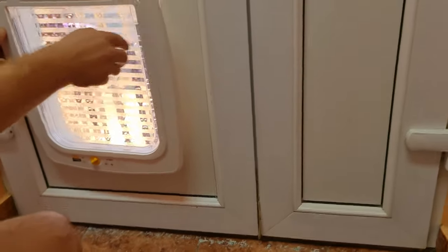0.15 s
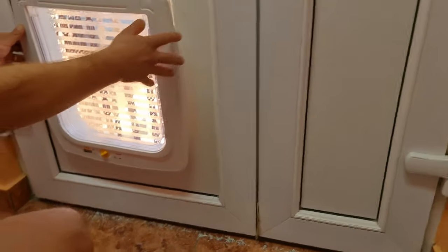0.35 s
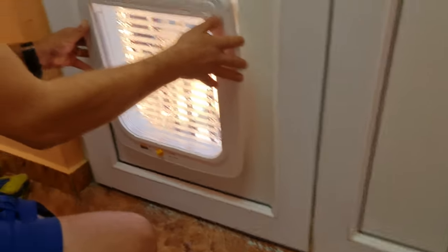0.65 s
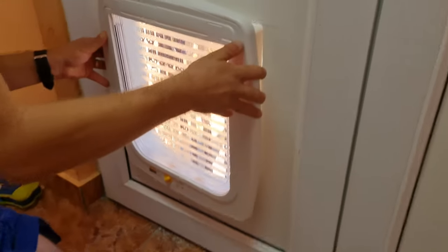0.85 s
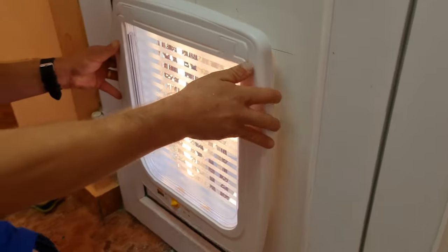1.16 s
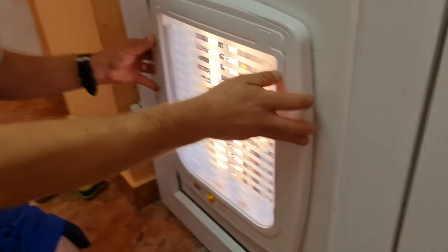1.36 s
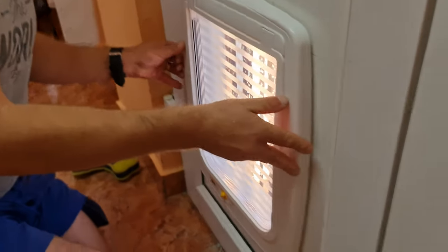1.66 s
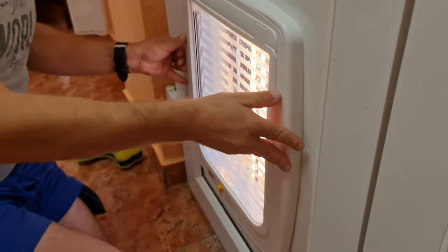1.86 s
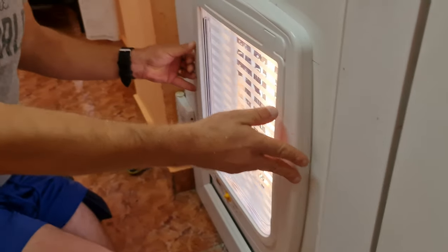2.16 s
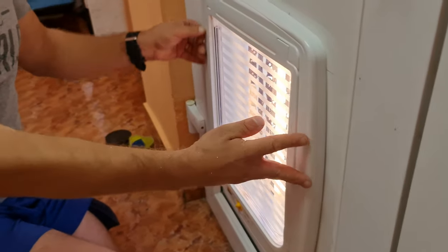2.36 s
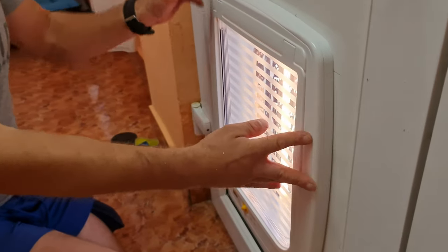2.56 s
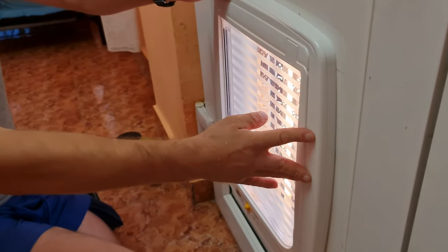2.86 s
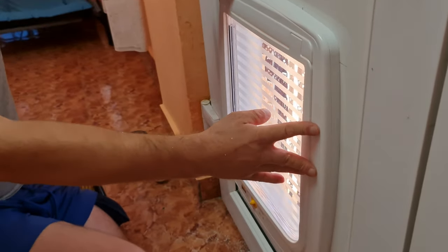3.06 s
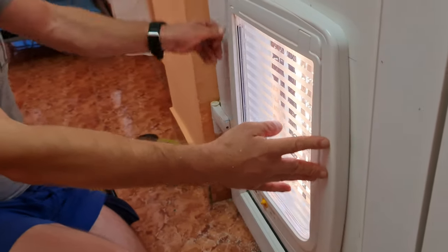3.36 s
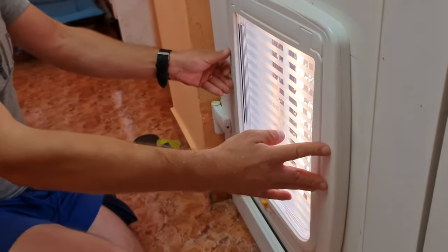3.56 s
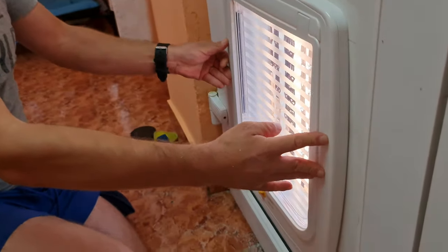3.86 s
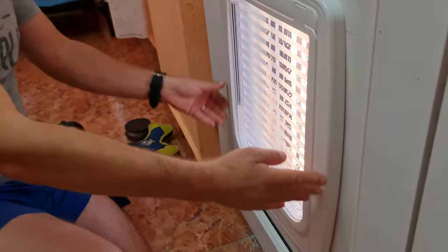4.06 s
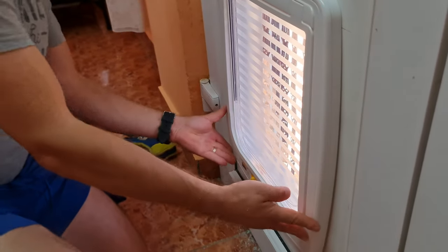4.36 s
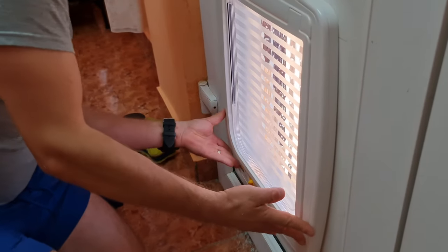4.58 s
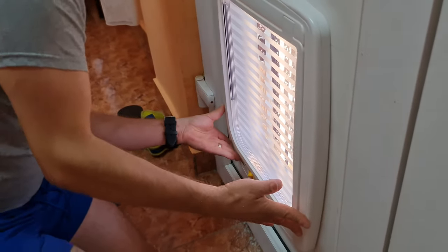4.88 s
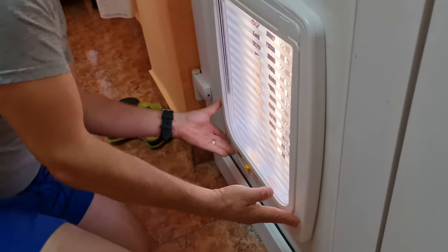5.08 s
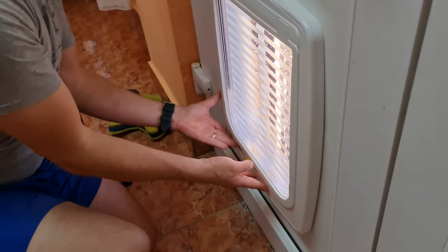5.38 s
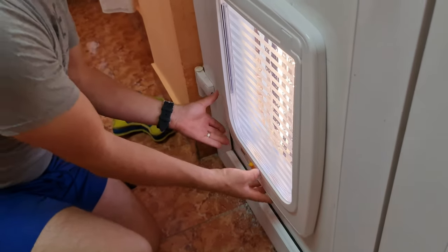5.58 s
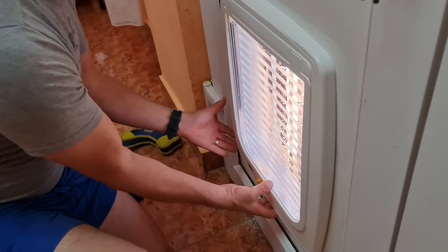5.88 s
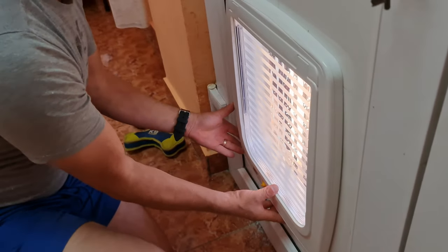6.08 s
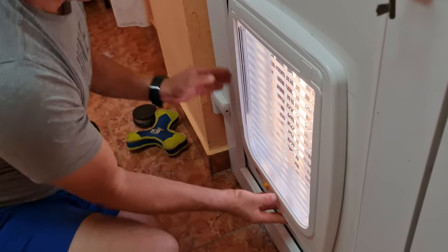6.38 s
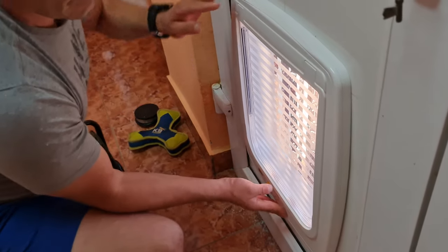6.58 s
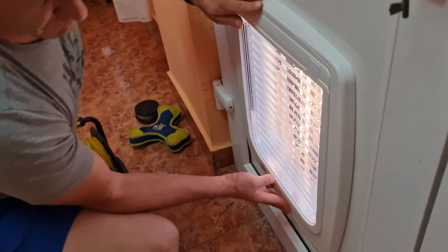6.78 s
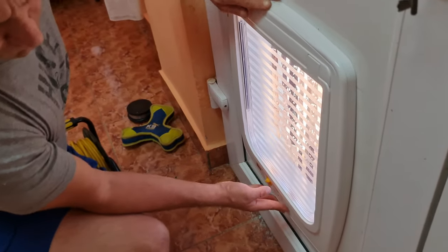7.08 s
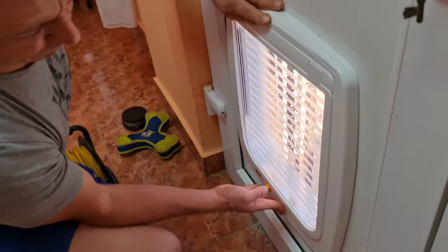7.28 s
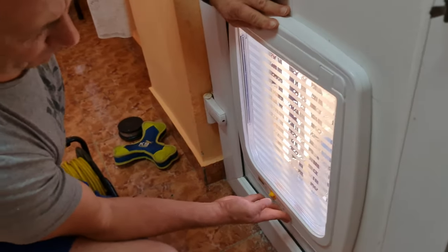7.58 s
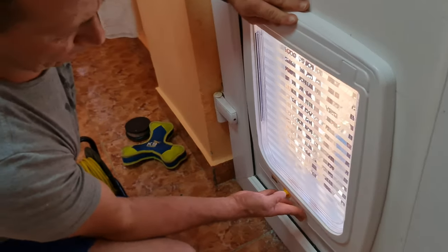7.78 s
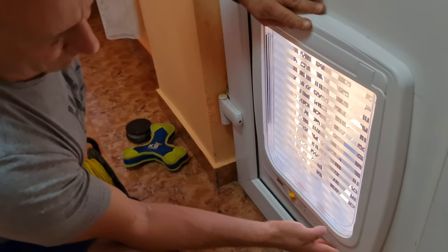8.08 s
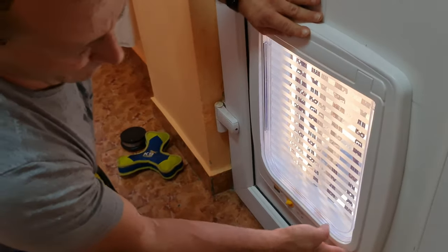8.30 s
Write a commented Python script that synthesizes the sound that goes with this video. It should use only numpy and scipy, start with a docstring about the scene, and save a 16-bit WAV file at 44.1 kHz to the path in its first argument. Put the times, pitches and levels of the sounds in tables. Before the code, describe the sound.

Hands knock a plastic pet-door frame against a hollow plastic door, with light finger taps, faint rubbing, and two buzzy catches snapping home in a small hard room.

```python
"""Dog flap pressed into a hollow door

Hands press a plastic frame into a hollow plastic door in a small hard room; two catches chatter and snap home.
Knocks and taps are shaped noise decays coloured by resonances; the door's boom is a sum of damped sine modes.
Snaps repeat one contact at a steady rate; sliding hands and the swaying door are noise under moving envelopes.
A brief soft hiss swells just before each knock, snap and tap.
A small metal part rings faintly at the start, and quiet room air lies beneath."""
import sys
import numpy as np
from scipy import signal
from scipy.fft import rfft, irfft, next_fast_len
from scipy.io import wavfile
from scipy.ndimage import map_coordinates

SR = 44100
rng = np.random.default_rng(int(sys.argv[2]) if len(sys.argv) > 2 else 0)


def to_wav(sig):
    """Store sig (one row per channel, or 1-D mono) as 16-bit WAV at the path in sys.argv[1].

    Samples outside -1..1 are clipped; the rate is SR.
    """
    pcm = np.clip(np.atleast_2d(sig), -1, 1) * 32767
    pcm = np.round(pcm).astype(np.int16)
    wavfile.write(sys.argv[1], SR, pcm.T)  # frames by channels


N = 372204
T = np.arange(SR) / SR  # one second of time [s]

# Blows of the frame on the door: (time [s], blow level [dB], boom, thud, body, click, fizz weights [dB],
# crack relative to the blow [dB], favoured resonance [Hz], push of the palm [dB])
KNOCKS = [(0.4927, -16.5, -18, -19.5, -0.5, -22.5, -41, -4, 453, -43),
          (1.0138, -8.5, -28, -11, 1, -13.5, -33.5, 6.5, 730, -43),
          (1.209, -20, -11, 0, -8, -47, -30, -20, 390, -34),
          (1.2416, -4, -52, -8, -4, -8, -26.5, -16, 1440, -29),
          (1.797, -35.5, -12, 6, 2, -9, -32, -20, 221, -38),
          (1.823, -16.5, -17, -7.5, 4, -11, -23, -18, 1300, -37),
          (1.835, -14.5, -5, -6.5, -17, -8, -14.5, 8.5, 1400, -36),
          (2.897, -23.5, -5, -12, -4, -9.5, -14, -3, 1700, -36.5),
          (3.443, -29, -11, -8.5, -4.5, -6, -17, -10, 1600, -55),
          (3.695, -23, -21, -10.5, -9, -14, -39, 6.5, 710, -42),
          (4.69, -31.5, -13, -7, -16, -16, -18, -18, 660, -39),
          (4.83, -27.5, -9, -16, -3.5, -20.5, -25, -22, 660, -37.5)]
# Catches snapping home: (time [s], blow level [dB], boom, thud, body, click, fizz weights [dB],
# favoured resonance [Hz], left minus right [dB], chatter rate [Hz], chatter's share of the power [0-1])
SNAPS = [(6.7577, -9.5, -18, -12.5, -3, -4, -10.5, 1150, 0.5, 378.3, 0.77),
         (8.3079, -13, -28, -8, -8.5, -1.5, -14, 4020, -0.5, 251.7, 0.87)]
# Fingers tapping the frame: (time [s], tap level [dB], weight behind it [dB], hardness [dB],
# favoured resonance [Hz])
TAPS = [(0.153, -28, -9.5, -36, 1250), (0.186, -35.5, -20, -7, 1050), (1.376, -31, -6, 1, 1136),
        (1.749, -34.5, -39, -11.5, 1290), (1.99, -26.5, -23, -15, 957), (2.116, -29, -29, -9.5, 690),
        (2.203, -32.5, -16, -24, 780), (2.334, -36.5, -11, -3.5, 1460), (2.372, -33.5, -20, -7.5, 1160),
        (2.522, -39.5, -21, -16, 545), (3.008, -28.5, -20, -14.5, 1670), (3.074, -29, -38, -18, 1100),
        (3.168, -33, -21, -8, 653), (3.271, -39, -21, -22, 804), (3.505, -39, -24, -2.5, 1080),
        (3.615, -37, -7, -4, 1370), (3.792, -33.5, -1, -24, 564), (3.935, -31.5, -14, -9.5, 554),
        (3.979, -34, -23, -19, 729), (4.095, -36, -8, -1, 1360), (4.143, -53.5, -23, 17.5, 670),
        (4.383, -36.5, -6, -10.5, 640), (4.578, -42.5, -5, -22, 675), (5.025, -39.5, -25, -8, 1660),
        (5.124, -36.5, -3.5, -29, 665), (5.247, -37.5, -15, -17, 805), (5.32, -37.5, -12, -12, 705),
        (5.622, -28, -18.5, -18.5, 710), (5.773, -33, -1.5, -9.5, 596), (6.027, -41.5, -9, -1.5, 1370),
        (6.042, -41.5, -24, -12, 606), (6.203, -28.5, -14, -6.5, 725), (6.385, -42, -6, -22, 780),
        (6.689, -29.5, -15, -8, 2240), (6.732, -36.5, -9.5, 4, 1120), (7.338, -35, -1, -1, 790),
        (7.614, -36, -10.5, -11, 1134), (7.702, -33.5, 0, -7, 940), (7.94, -34, -25, -22, 707),
        (7.961, -46.5, -4, 6.5, 654), (8.005, -39.5, -14, -7, 670), (8.195, -29.5, -18, -12, 695)]
# Relative spectrum of the fine hiss in slides and lead-ins: (frequency [Hz], density [dB per Hz])
HISS = [(880, -5), (1500, -4.5), (2110, -7), (2780, -4.5), (3120, -8.5), (6690, -8), (7670, -15),
        (12400, -17), (15500, -20)]


def knocks():
    """Impact and rebound: a lead-in, a blow, one bounce and the panel's boom; gentler blows close more slowly."""
    # Hard edge on hard edge, relative spectrum: (frequency [Hz], density [dB per Hz])
    crack_spectrum = [(800, -23), (2500, -52), (3800, 13.5), (4800, 1), (6500, -4), (9000, -63),
                      (15000, -51)]
    bounce_s, bounce_db, crack_t60_s = 0.0068, -10, 0.021
    out = np.zeros((2, N))
    for s, db, boom_db, thud_db, body_db, click_db, fizz_db, crack_db, ring_hz, _ in KNOCKS:
        blow = contact(rise=0.00034 * amp(-0.7 * db), damping=0.96, edge_db=-7.5, room_db=2.0)
        bounce = contact(rise=0.0001, damping=1.7, edge_db=-23.5, room_db=3.5)[:, :SR // 2]
        add(blow, bounce_s, amp(bounce_db) * bounce)
        clack = frame(blow, boom_db, thud_db, body_db, click_db, fizz_db, ring_hz, ring_db=5.0)
        crack = amp(db + crack_db - 18.5 - 60 * T / crack_t60_s) * noise(SR, crack_spectrum)
        add(out, *lead_in(s, 0.32 * db - 15.5))
        add(out, s, amp(db + 35.5) * clack)
        add(out, s, crack)
        add(out, s, amp(db - 9.0) * panel(boom_db, thud_db, body_db, rise=0.0093))
    return placed(out, pan_db=-0.1)


def snaps():
    """Periodic stick-slip: a catch skids over its ridge in even slips that buzz at a pitch, plus one plain blow."""
    # The catch's peaks and dips: (centre [Hz], width [Hz], gain [dB])
    catch = [(340.4, 35, 6.5), (585, 41, 6.5), (686, 100, 5), (758, 68, -2), (1160, 46, 5.5),
             (1875, 870, 8), (6400, 760, -1), (12300, 3600, -5.5)]
    slip_count, jitter, skid_s = 12, 0.008, 0.012  # jitter is in slip periods
    out = np.zeros((2, N))
    for (s, db, boom_db, thud_db, body_db, click_db, fizz_db,
         ring_hz, pan_db, chatter_hz, share) in SNAPS:

        def catch_colour(x):
            """Resonant filtering by the frame and its catch."""
            coloured_blow = frame(x, boom_db, thud_db, body_db, click_db, fizz_db,
                                  ring_hz, ring_db=1, parts=catch)
            return placed(amp(db + 41.5) * coloured_blow, pan_db)

        periods = np.arange(slip_count) + jitter * rng.standard_normal(slip_count)
        delays = np.maximum(periods, 0) / chatter_hz
        force = np.exp(-(delays / skid_s) ** 4)
        slip = catch_colour(contact(rise=0.00019, damping=0.44, edge_db=-8.5, room_db=0.5))
        plain = catch_colour(contact(rise=0.00086, damping=1.0, edge_db=-13.0, room_db=4.5))
        add(out, *lead_in(s, db))
        for delay, size in zip(delays, force / np.linalg.norm(force)):
            add(out, s + delay, np.sqrt(share) * size * slip)
        add(out, s, np.sqrt(1 - share) * plain)
        add(out, s, amp(db - 4.0) * panel(boom_db, thud_db - 8, body_db, rise=0.0091))
    return out


def taps():
    """Light impact and rattle: after a lead-in a finger taps the frame, and the loose flap ticks once more."""
    rattle_delays_s, rattle_db, rattle_spread_db = (0.04, 0.14), -16.5, 3
    out = np.zeros((2, N))
    delays, sizes = rng.random(len(TAPS)), rng.standard_normal(len(TAPS))
    for (s, db, weight_db, hard_db, ring_hz), delay, size in zip(TAPS, delays, sizes):
        add(out, *lead_in(s, db - 5.5))
        add(out, s, tap(db, weight_db, hard_db, ring_hz))
        tick_db = db + rattle_db + rattle_spread_db * size
        rattle = tap(tick_db, weight_db=-19.5, hard_db=-2, ring_hz=690)
        add(out, s + np.interp(delay, [0, 1], rattle_delays_s), rattle)
    return out


def tap(db, weight_db, hard_db, ring_hz):
    """Contact stiffness: hard nails tick at once and brightly, dull pads land slowly; weight adds a thud."""
    fizz_db = hard_db - 10  # the top octave lies under the click
    blow = contact(rise=0.00015 * amp(-0.55 * fizz_db), damping=0.91, edge_db=-12, room_db=0.5)
    ticking = frame(blow, weight_db - 2.5, weight_db + 5.5, weight_db * 0.28,
                    hard_db, fizz_db, ring_hz, ring_db=8.5)
    return amp(db + 33.5) * ticking


def lead_in(s, db):
    """Exponential envelope: a brief soft hiss swells just before a blow; gives (start [s], sound)."""
    swell_s, level_db = 0.014, -26
    t = T[:SR // 16]
    swell = np.exp((t - t[-1]) / swell_s)
    return s - t[-1], amp(db + level_db) * swell * noise(len(t), HISS)


def contact(rise, damping, edge_db, room_db):
    """Impulse response of one contact: a sharp edge, the plastic's short dense ring, the room's reverberation."""
    # The struck frame's ring before extra damping: (frequency [Hz], t60 [s])
    plastic = [(200, 0.31), (1000, 0.078), (4000, 0.12), (12000, 0.028)]
    # The room's reverberation: (frequency [Hz], t60 [s])
    reverberation = [(50, 0.78), (170, 0.19), (400, 0.54), (1500, 0.54), (4300, 0.65), (7000, 0.51),
                     (13000, 0.36)]
    # Colour of the room's tail, on top of room_db: (frequency [Hz], gain [dB])
    wet = [(100, -3), (400, -4), (1500, -4), (5000, -3), (12000, -5.5)]
    direct = dying(SR // 4, [(hz, t60 / damping) for hz, t60 in plastic])
    direct *= 1 - np.exp(-T[:SR // 4] / rise)
    direct /= np.linalg.norm(direct[0])
    direct[0, 4] += amp(edge_db)  # the right microphone is a little nearer, so left is 4 samples late
    direct[1, 0] += amp(edge_db)
    tail = filtered(dying(SR * 3 // 4, reverberation), lambda hz: amp(room_db + along(wet, hz)))
    tail *= 1 - np.exp(-T[:tail.shape[1]] / (rise + 0.0058))
    tail[:, :SR // 4] += direct
    return tail


def frame(x, boom_db, thud_db, body_db, click_db, fizz_db, ring_hz, ring_db, parts=()):
    """Resonant filtering: hardness weights bass and treble, and the spot struck favours one resonance."""
    # Centres of the weighted registers: (frequency [Hz])
    registers = [50, 190, 370, 700, 2000, 4500, 10000]
    # Relative spectrum of plastic on plastic: (frequency [Hz], density [dB per Hz])
    clack_spectrum = [(25, -22.5), (60, -5.5), (170, 2.5), (270, -2.5), (450, -6), (950, -9), (2000, -15),
                      (3000, -13.5), (5000, -12.5), (7000, -13), (8500, -13.5), (12000, -12.5),
                      (15500, -21)]
    # The frame's resonances: (centre [Hz], width [Hz], gain [dB])
    frame_resonances = [(359.6, 25, 6.5), (431, 15, 1), (610, 80, 2), (690, 270, 2), (1240, 200, 1.5),
                        (1457, 330, 0.5), (1680, 100, 3), (2410, 440, 2.5), (4070, 1030, 3),
                        (6430, 1500, 7)]
    weights = list(zip(registers, [boom_db, thud_db, body_db, 0, 0, click_db, fizz_db]))
    resonances = list(frame_resonances) + list(parts) + [(ring_hz, ring_hz * 0.24, ring_db)]
    return coloured(x, lambda hz: along(clack_spectrum, hz) + along(weights, hz) + bumps(resonances, hz))


def panel(boom_db, thud_db, body_db, rise):
    """Modal vibration: damped bending modes of the door, varying in strength and tuning with each push."""
    # The hollow door's nominal bending modes: (frequency [Hz], relative level [dB], t60 [s])
    modes = [(35.9, -3.5, 1), (50.1, -5, 1), (64.9, -5, 0.56), (97.4, 6, 0.35), (123, -2, 0.35),
             (139.3, -3, 0.41), (170.9, -1, 0.43), (205.5, 2, 0.28), (223.8, -6.5, 0.37),
             (337.8, -16, 0.58), (393, -7, 0.2), (447.7, -17, 0.43)]
    weights = [(50, boom_db), (130, thud_db), (230, thud_db), (330, body_db)]
    chance = rng.standard_normal((len(modes), 2))
    ring = np.zeros(SR)
    for k, ((hz, db, t60), (size, detune)) in enumerate(zip(modes, chance)):
        decay = amp(db + along(weights, hz) + 2 * size - 60 * T / t60)
        sign = (-1) ** k
        ring += sign * decay * np.sin(2 * np.pi * hz * (1 + 0.012 * detune) * T)
    return ring * (1 - np.exp(-T / rise))


def flexes():
    """Forced modal response: soft pushes of palm and fingers move only the panel."""
    # The panel gives way under the palm: (time [s], boom level [dB], thud relative to it [dB])
    palm_flexes = [(1.417, -25.5, -8.5), (2.579, -51.5, 1), (2.988, -30.5, -10), (3.727, -30.5, 0),
                   (7.717, -30.5, -28)]
    finger_lag_s, finger_push_db, growth, finger_thud_db = 0.01264, -4, 0.78, -5  # growth: dB per dB of weight
    palms = [(s, db, 0) for s, db in pushes()]
    fingers = [(s + finger_lag_s, db + finger_push_db + growth * weight_db, finger_thud_db)
               for s, db, weight_db, *_ in TAPS]
    out = np.zeros((2, N))
    for s, db, thud_db in list(palm_flexes) + palms + fingers:
        add(out, s, amp(db - 9) * panel(0, thud_db, thud_db + 5.5, rise=0.0025))
    return out


def pushes():
    """Delayed loading: (time [s], level [dB]) of the palm's weight arriving behind each knock and snap."""
    lag_s, snap_push_db = 0.027, -21.5  # a snap's push is relative to its blow
    behind_knocks = [(s + lag_s, push_db) for s, *_, push_db in KNOCKS]
    behind_snaps = [(s + lag_s, db + snap_push_db) for s, db, *_ in SNAPS]
    return behind_knocks + behind_snaps


def slides():
    """Friction noise: skin grips and slips unevenly, a rub under a finer hiss that swell and fade each stroke."""
    # Strokes of skin and sleeves on the plastic: (time [s], length [s], rub level [dB], hiss level [dB])
    long_strokes = [(0, 0.32, -50.5, -57.5), (0.314, 0.57, -80, -57.5), (0.476, 0.1, -40, -56),
                    (0.738, 1, -50.5, -55), (1.08, 0.46, -44, -49), (1.204, 0.12, -35.5, -41),
                    (2.1, 0.56, -63, -61), (3.94, 0.26, -51, -57), (4.433, 0.21, -59, -58),
                    (4.67, 0.17, -48, -55), (5.06, 0.25, -58, -60.5), (5.307, .23, -77, -51.5),
                    (6.447, 0.13, -64, -60), (7.3, 0.35, -57, -64.5)]
    # Relative spectrum of the rub: (frequency [Hz], density [dB per Hz])
    rub_spectrum = [(88, -43), (150, -37), (315, 0), (450, 3.5), (569, -9), (791, 3), (972, -12.5),
                    (1390, -6), (4000, -20.5), (5200, -52), (8800, -120)]
    # Rubbed plastic sings a little: (centre [Hz], width [Hz], gain [dB])
    singing = [(2650, 140, 0), (4100, 190, 4.5)]
    # The hand slips a little after every knock and tap, more after a louder one (growth: dB per dB)
    slip_s, slip_rub_db, slip_hiss_db, growth = 0.15, -38, -68, 0.68
    slips = [(s, slip_s, slip_rub_db + growth * db, slip_hiss_db + growth * db)
             for s, db, *_ in list(KNOCKS) + list(TAPS)]
    power = np.zeros((2, N))  # rub and hiss rows
    for s, length, rub_db, hiss_db in list(long_strokes) + slips:
        speed = np.maximum(np.sin(np.pi * np.minimum(T / length, 1) ** 0.48), 0) ** 0.55
        add(power, s, (amp([[rub_db], [hiss_db]]) * speed) ** 2)
    rub_level, hiss_level = np.sqrt(power)
    grip = wobble(70)
    rub = unit(amp(2.9 * grip) * noise(N, rub_spectrum))
    flicker = amp(0.61 * grip + 1.05 * wobble(600))
    hiss = unit(filtered(flicker * noise(N, HISS), lambda hz: amp(bumps(singing, hz))))
    return rub_level * rub + hiss_level * hiss


def ping():
    """Exponential decay of narrow-band noise: a small metal part rings faintly and dies away."""
    ring = noise(SR, [(9800, -19.5), (10450, -33), (10630, 4.5), (10900, -22), (11600, -24),
                      (12600, -20), (12950, -5), (13400, -28), (15000, -44)])  # ([Hz], [dB per Hz])
    out = np.zeros((2, N))
    add(out, 0, ring * amp(-42.0 - 60 * T / 0.26))
    return out


def sway():
    """Slow forced motion: every push of the palm sets the door swaying, a rumble that swells and settles."""
    # Relative spectrum of the swaying door: (frequency [Hz], density [dB per Hz])
    rumble = [(15, -32), (25, -12), (36, 0), (50, -4), (70, -0.5), (100, 2.5), (160, -10.5), (250, -7.5),
              (500, -72)]
    peak_s, sway_db, rest_db = 0.12, -22, -68  # time to peak, level re the push, level under resting hands
    swell = T / peak_s * np.exp(1 - T / peak_s)
    power = np.full((1, N), amp(rest_db) ** 2)
    for s, db in pushes():
        add(power, s, (amp(db + sway_db) * swell) ** 2)
    return np.sqrt(power) * noise(N, rumble)


def air():
    """Stationary background noise: the quiet air of the room."""
    # Relative spectrum of the air: (frequency [Hz], density [dB per Hz])
    air_spectrum = [(15, -27), (25, -15.5), (50, 15), (100, -12), (160, -11.5), (210, 0.5), (300, -5),
                    (700, -3), (1100, -8.5), (2500, -11.5), (4000, -17.5), (6300, -14.5), (8500, -22.5),
                    (15500, -26.5)]
    return amp(-59) * noise(N, air_spectrum)


def noise(size, spectrum=None):
    """Interaural coherence: stereo noise of rms 1, clearly alike at both microphones only in the bass."""
    # Left-right likeness: (frequency [Hz], correlation [-1 to 1])
    alike = [(120, 0.62), (260, 0.79), (500, -0.082), (1200, -0.22), (4000, 0.022), (12000, -0.013)]

    def mid_side_gain(hz):
        """Power split: a mid and side mixing angle sets the correlation."""
        angle = np.arccos(np.clip(along(alike, hz), -1, 1)) / 2
        colour = 1 if spectrum is None else amp(along(spectrum, hz))
        return colour * np.array([np.cos(angle), np.sin(angle)])

    mid, side = filtered(rng.standard_normal((2, size)), mid_side_gain)
    return unit(np.array([mid + side, mid - side]))


def dying(size, t60s):
    """Frequency-dependent decay: stereo noise, left energy 1, each frequency fading at its own speed."""
    hz, t, z = signal.stft(noise(size), SR, nperseg=128)
    t60 = along(t60s, hz)[:, None]
    faded = z * amp(-60 * t / t60) / np.sqrt(t60)
    tail = signal.istft(faded, SR, nperseg=128)[1][:, :size]
    return tail / np.linalg.norm(tail[0])


def coloured(x, level, size=4096):
    """Minimum-phase filtering by a dB function of frequency: the filter is causal."""
    cepstrum = irfft(np.log(amp(level(np.fft.rfftfreq(size, 1 / SR)))))
    # Folding the cepstrum onto positive times makes the response causal
    cepstrum[1:size // 2] *= 2
    cepstrum[size // 2 + 1:] = 0
    response = irfft(np.exp(rfft(cepstrum)))
    return signal.fftconvolve(x, response[None], axes=1)[:, :x.shape[-1]]


def filtered(x, gain):
    """Linear filtering: the spectrum times a gain that depends on frequency."""
    size = next_fast_len(x.shape[-1] + 8192)
    spectrum = rfft(x, size) * gain(np.fft.rfftfreq(size, 1 / SR))
    return irfft(spectrum, size)[..., :x.shape[-1]]


def bumps(resonances, hz):
    """Resonance curves: the summed dB peaks of (centre [Hz], width [Hz], gain [dB])."""
    return sum(db / (1 + (2 * (hz - centre) / width) ** 2) for centre, width, db in resonances)


def along(points, hz):
    """Logarithmic pitch scale: (frequency [Hz], value) points joined on a log axis."""
    f, v = np.transpose(points)
    return np.interp(np.log(hz + 1), np.log(f + 1), v)


def wobble(rate):
    """Slow random modulation: a smooth curve with rate knots a second."""
    knots = rng.standard_normal(int(N * rate / SR) + 4)
    return map_coordinates(knots, [np.arange(N) * rate / SR])


def placed(x, pan_db):
    """Level-difference panning: left minus right in dB."""
    return x * amp([[pan_db / 2], [-pan_db / 2]])


def add(track, s, sound):
    """Superposition: mix a sound in at a time."""
    start = round(s * SR)
    track[:, start:start + sound.shape[-1]] += sound[..., :N - start]


def amp(db):
    """Level to amplitude: decibels to gain."""
    return 10 ** (np.asarray(db) / 20)


def unit(x):
    """Root-mean-square normalisation: scale to rms 1."""
    return x / np.sqrt(np.mean(x ** 2) + 1e-20)


def scene():
    """Superposition of sources: the door sits slightly to the right, over the quiet air of the room."""
    door = knocks() + snaps() + taps() + flexes() + slides() + ping() + sway()
    return placed(door, pan_db=-1.4) + air()


def record(dry):
    """Saturation and band limiting: the highest peaks are rounded and the extreme treble is cut steeply."""
    cutoff_hz = 15600
    rounded = dry / (1 + dry ** 6) ** (1 / 6)
    return filtered(rounded, lambda hz: 1 / np.sqrt(1 + (hz / cutoff_hz) ** 160))


dry = scene()
out = record(dry)
to_wav(out)
```